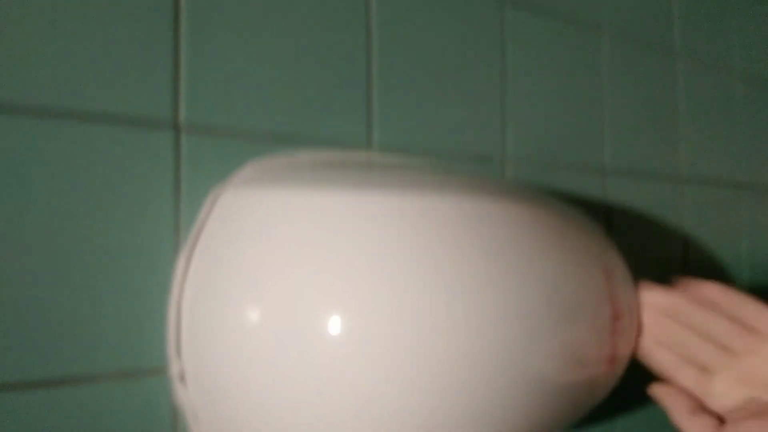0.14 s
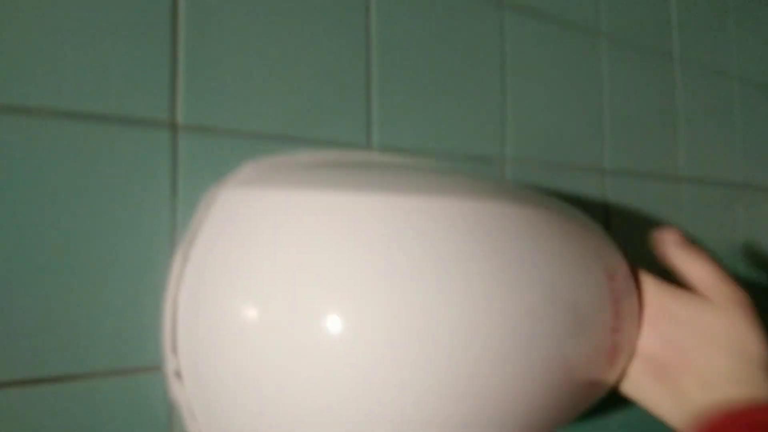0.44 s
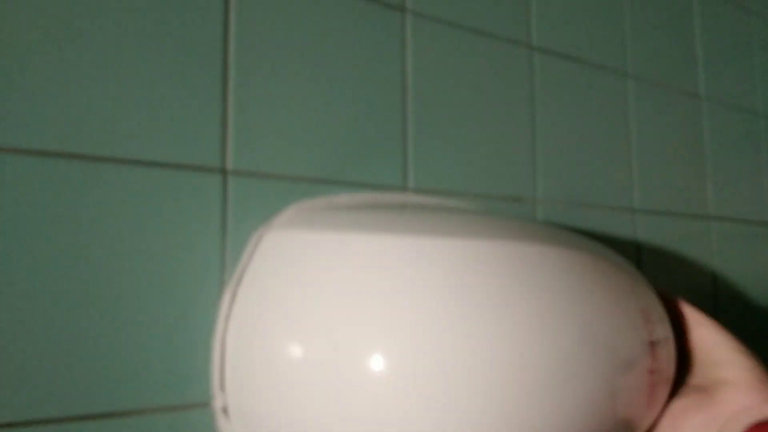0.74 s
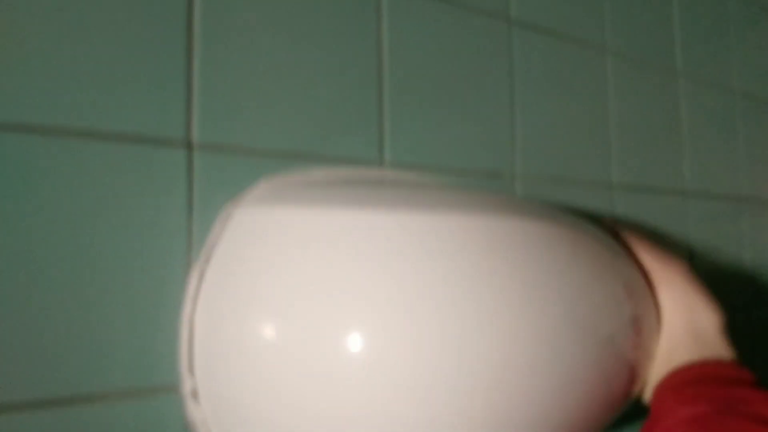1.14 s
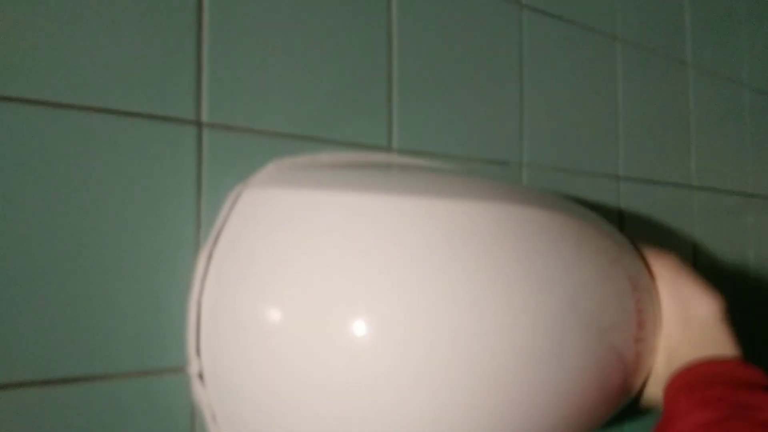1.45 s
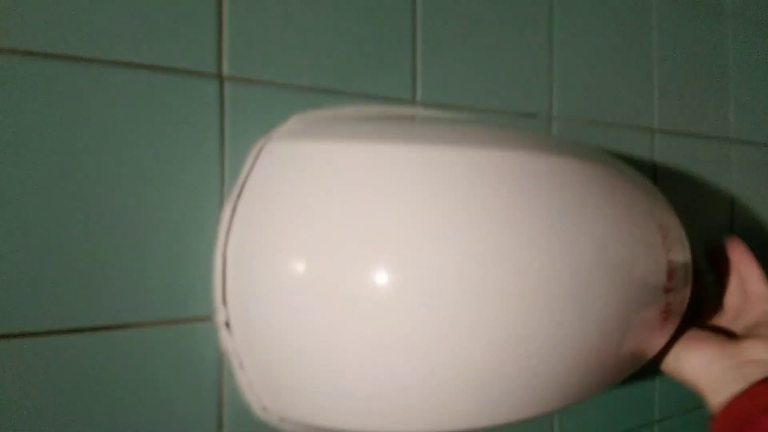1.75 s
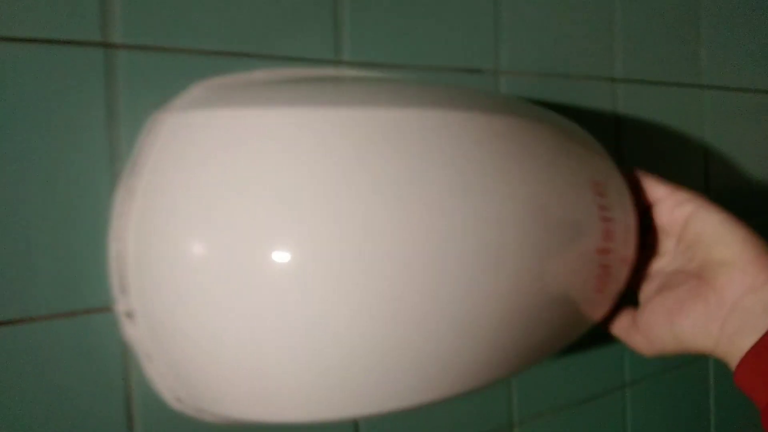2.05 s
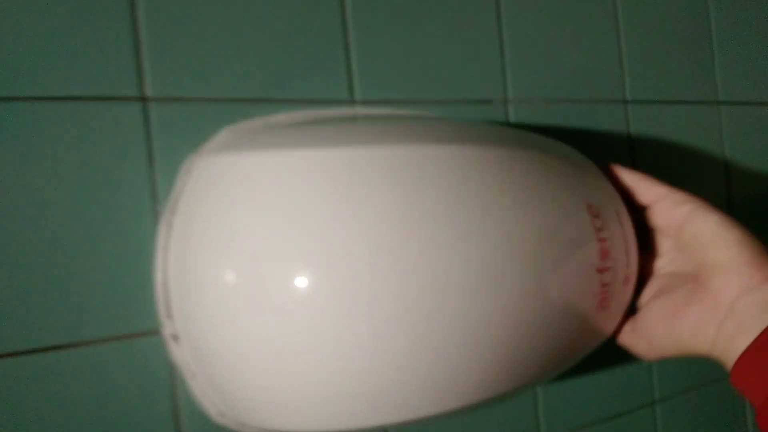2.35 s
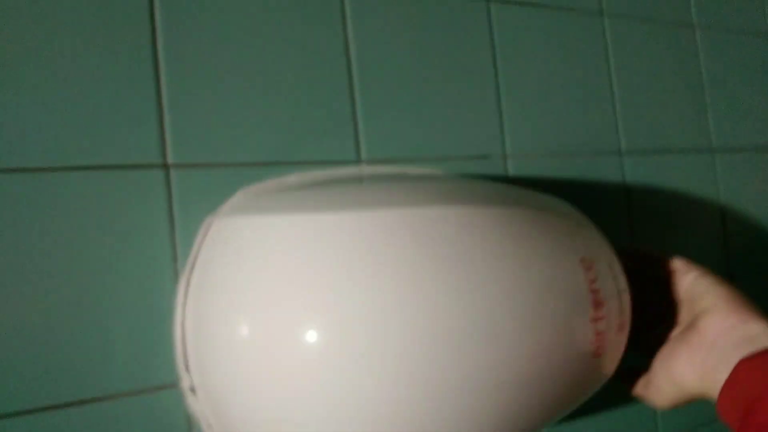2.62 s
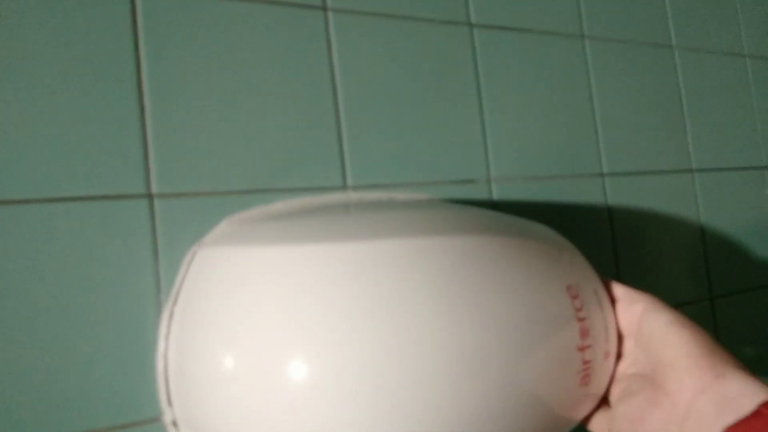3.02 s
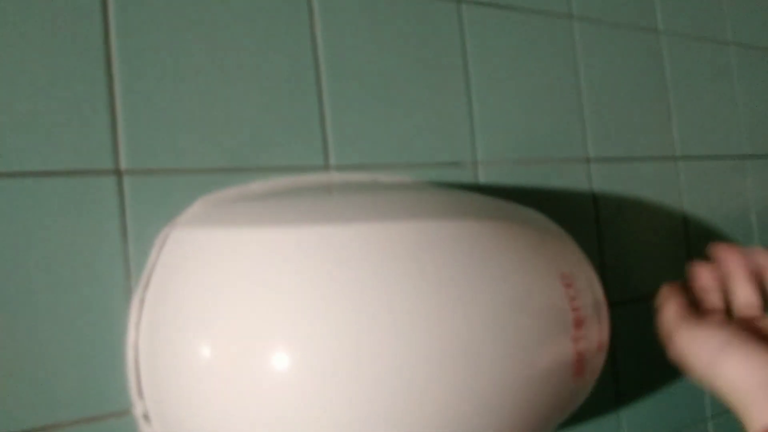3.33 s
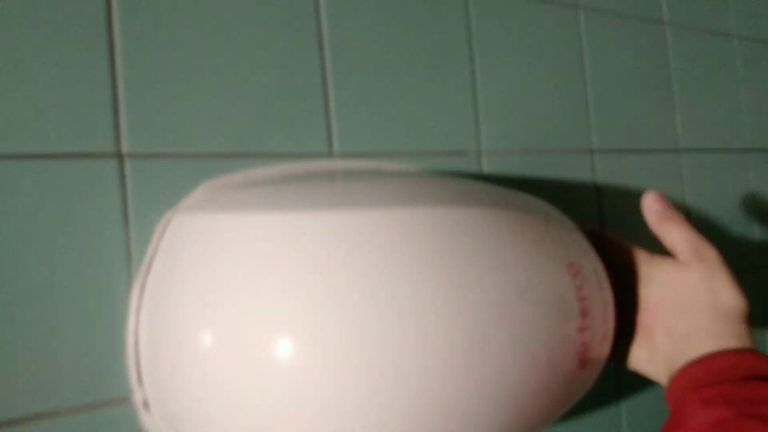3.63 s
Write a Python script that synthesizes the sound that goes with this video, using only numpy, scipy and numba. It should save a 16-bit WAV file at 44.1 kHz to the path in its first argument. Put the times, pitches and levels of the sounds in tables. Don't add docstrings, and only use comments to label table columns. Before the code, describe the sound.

A hand dryer runs throughout in a tiled washroom, close to a single microphone: broad air rush and thin high whine, with bright hissing bursts and lower whistling roars as a hand moves through the jet.

```python
import sys
import numpy as np
from scipy import signal
from scipy.fft import rfft, irfft
from scipy.io import wavfile
from scipy.ndimage import uniform_filter1d
from numba import njit

SR = 44100
rng = np.random.default_rng(int(sys.argv[2]) if len(sys.argv) > 2 else 0)


def int16_out(signal):
    q = np.round(np.clip(np.atleast_2d(signal).T, -1, 1) * 32767)
    wavfile.write(sys.argv[1], SR, q.astype(np.int16))


def volts_from_decibels(level):
    exponent = np.asarray(level, float) / 20
    return 10 ** exponent


N = 166698


def unit(x):
    return x / np.sqrt(np.mean(x ** 2))


def walk(rate_hz):
    hold = int(SR / rate_hz)
    steps = np.repeat(rng.standard_normal(N // hold + 1), hold)
    return 1.3 * uniform_filter1d(uniform_filter1d(steps, hold), hold)[:N]


def bands(colour, walk_db, flicker_db):
    point_hz, point_db = np.array(colour).T
    hz = np.fft.rfftfreq(N, 1 / SR) + 1
    swell = walk(3.22)
    spectrum = rfft(rng.standard_normal(N)) * volts_from_decibels(np.interp(np.log(hz), np.log(point_hz), point_db))
    air = np.zeros(N)
    for k in range(-1, 28):
        thirds_away = np.clip(3 * np.log2(hz / 32) - k, -1, 1)
        band = irfft(spectrum * np.cos(np.pi / 2 * thirds_away) ** 2, N)
        air += band * volts_from_decibels(walk_db * swell + flicker_db * walk(8.94))
    return unit(air)


@njit
def svf(x, hz, k):
    y, band, low = np.empty(len(x)), 0., 0.
    for i in range(len(x)):
        g = np.tan(np.pi * hz[i] / SR)
        v = (band + g * (x[i] - low)) / (1 + g * (g + k))
        band, low, y[i] = 2 * v - band, low + 2 * g * v, k * v
    return y


def motor(t):
    # start_s, blade_pitch_hz, blade_db, shaft_db
    motor_course = [(0, 5031, -26, -36), (.3, 5023, -27, -38), (.55, 5028, -27, -37), (.72, 5020, -36, -39),
                    (.92, 5011, -23, -34), (1.3, 5023, -23, -41), (1.5, 5027, -32, -33),
                    (1.74, 5032, -24, -33), (2.0, 5026, -24, -31), (2.15, 5028, -31, -33),
                    (2.38, 5031, -34, -35), (2.62, 5034, -24, -48), (2.97, 5034, -22, -46),
                    (3.25, 5040, -33, -42), (3.42, 5040, -30, -50), (3.55, 5041, -24, -48),
                    (3.78, 5040, -23, -46)]
    # shaft_multiple, level_db
    whine = [(2, -41), (10, -41), (12, -35), (18, -33.5), (24, -43.5)]
    blades, speed_jitter = 9, .0005
    wander_per_s, wander_db = 40, 2.8
    times, blade_hz, blade_db, shaft_db = np.array(motor_course).T
    shaft_hz = np.interp(t, times, blade_hz) / blades * (1 + speed_jitter * walk(24.9))
    turn = 2 * np.pi * np.cumsum(shaft_hz) / SR
    orders = [(1, np.interp(t, times, shaft_db)), (blades, np.interp(t, times, blade_db))] + list(whine)
    tones = np.zeros(N)
    for k, db in orders:
        tones += np.sqrt(2) * volts_from_decibels(db + wander_db * walk(wander_per_s)) * np.sin(k * turn + k)
    return tones


def casing(t):
    # centre_hz, width_hz, level_db
    resonances = [(125.5, 17, -41), (194.5, 16, -40.5), (299.4, 59, -34.5), (754, 134, -33)]
    bump_db, bump_s = 10.5, 0.071
    hum = np.zeros(N)
    for hz, width_hz, db in resonances:
        ring = unit(svf(rng.standard_normal(N), np.full(N, 1. * hz), width_hz / hz))
        bump = 1 + (hz < 400) * volts_from_decibels(bump_db) * np.exp(-t / bump_s)
        hum += volts_from_decibels(db + 1.44 * walk(4.1)) * ring * bump
    return hum


def free_jet():
    # pitch_hz, level_db per Hz
    jet_colour = [(20, 7), (75, -15), (130, -5), (600, 0.5), (1500, -3.5), (4000, -5), (6800, -0.5),
                  (15800, -19.5)]
    return volts_from_decibels(-20.5) * bands(jet_colour, 0.78, 0.89)


def pass_power(t, start, end, db, rise, fall):
    bend_s = 0.12
    early, late = np.maximum(start - t, 0), np.maximum(t - end, 0)
    drop_db = (rise * early + fall * late) * (1 + (early + late) / bend_s)
    return volts_from_decibels(2 * (db - drop_db))


def splash(t):
    # start_s, end_s, level_db, fade_in_db_per_s, fade_out_db_per_s
    palm_passes = [(0.0, 0.09, -8, 198, 94), (0.411, 0.516, -6.5, 250, 38), (0.818, 0.864, -11, 150, 93),
                   (1.06, 1.096, -10.5, 254, 98), (1.168, 1.29, -7, 124, 29), (1.375, 1.47, -6, 30, 27.5),
                   (1.575, 1.662, -8, 53, 72), (2.032, 2.07, -16, 18, 62), (2.405, 2.486, -9.5, 158, 92),
                   (3.008, 3.167, -9.5, 62, 75), (3.758, 3.8, -16.5, 46, 46)]
    # pitch_hz, level_db per Hz
    hiss_colour = [(500, -15.5), (1500, -18), (3000, -12), (5000, -5.5), (7000, -1.5), (8200, -4.5),
                   (10000, -14.5), (15800, -21)]
    # pitch_hz, level_db per Hz
    sizzle_colour = [(5000, -19), (8500, -11.5), (10000, 0.5), (13000, -7), (15800, -7)]
    sizzle_db, sizzle_steepness = -10, 2.37
    gain = np.sqrt(uniform_filter1d(sum(pass_power(t, *row) for row in palm_passes), 600))
    peak = gain.max()
    hiss = gain * bands(hiss_colour, .5, 0.95)
    sizzle_gain = volts_from_decibels(sizzle_db) * peak * (gain / peak) ** sizzle_steepness
    sizzle = sizzle_gain * bands(sizzle_colour, 0.37, 0.49)
    return (hiss + sizzle) * volts_from_decibels(1.1 * walk(32))


def buffet(t):
    # start_s, level_db, top_hz, length_s
    gusts = [(.004, -10, 169, 0.026), (0.021, -16, 101, 0.099), (0.05, -16.5, 340, 0.087),
             (0.402, -13, 110, .03), (.43, -23, 69.4, 0.03), (0.515, -27, 200, .02), (1.107, -35, 250, .05),
             (1.196, -30, 298, .05), (1.353, -26, 298, 0.064), (1.558, -29, 120, .02),
             (2.218, -20, 250, 0.03), (2.249, -15, 119, 0.019), (2.269, -14.5, 347, .02),
             (2.3, -23, 80, 0.022), (2.359, -18, 60, 0.022), (2.42, -25, 200, 0.032),
             (2.976, -31.5, 80, .05), (3.065, -8.5, 129, 0.03), (3.09, -11.5, 450, 0.024),
             (3.128, -9, 148, 0.03)]
    attack_s = 0.0021
    thuds = np.zeros(N)
    for start, db, top_hz, length in gusts:
        low_band = signal.butter(2, [30, top_hz], "band", fs=SR, output="sos")
        noise = unit(signal.sosfilt(low_band, rng.standard_normal(N)))
        age = np.maximum(t - start, 0)
        thuds += volts_from_decibels(db) * noise * (1 - np.exp(-age / attack_s)) * np.exp(-(age / length) ** 2)
    return thuds


def moving_ring(hz, width):
    return svf(rng.standard_normal(N), hz, width) / np.sqrt(hz)


def roar(t):
    # start_s, level_db, centre_hz, fade_in_db_per_s, fade_out_db_per_s
    finger_passes = [(.03, -18, 2300, 56, 88), (.4, -17, 1530, 152, 41), (.56, -24, 2500, 28, 24),
                     (.72, -21, 1190, 25, 10), (.83, -14.5, 2920, 100, 44), (.91, -18.5, 1900, 36, 120),
                     (1.06, -14.5, 1940, 150, 33), (1.3, -18, 3140, 13, 27), (1.57, -13.5, 2600, 24, 31),
                     (1.74, -28, 1200, 30, 12), (1.94, -17, 1610, 48, 10), (2.03, -16.5, 2130, 58, 30),
                     (2.1, -20.5, 1560, 34, 90), (2.33, -17, 1500, 76, 40), (2.4, -15.5, 3230, 80, 26),
                     (2.531, -14, 2020, 32, 64), (2.9, -16.5, 1470, 47, 42), (2.97, -17, 2370, 71, 4),
                     (3.1, -18.5, 3730, 22, 29), (3.21, -15.5, 2620, 42, 132), (3.28, -23.5, 1000, 37, 85),
                     (3.66, -19, 1310, 57, 3), (3.76, -17, 2180, 60, 10)]
    skirt_db, skirt_ratio = -5.5, 0.43
    edge_db, edge_width = -14.5, 0.093
    powers = [pass_power(t, s, s, db, rise, fall) for s, db, _, rise, fall in finger_passes]
    total = sum(powers) + 1e-12
    centre_hz = sum(p * row[2] for p, row in zip(powers, finger_passes)) / total
    centre_hz = np.clip(uniform_filter1d(centre_hz, 1500), 300, 8000)
    core = unit(svf(moving_ring(centre_hz * (1 + 0.035 * walk(14)), 1), centre_hz, 2.5))
    skirt = volts_from_decibels(skirt_db) * unit(moving_ring(centre_hz * skirt_ratio, 1.43))
    edge = unit(moving_ring(centre_hz * (1 + 0.048 * walk(6)), edge_width))
    body = core + skirt + volts_from_decibels(edge_db + 4.4 * walk(15)) * edge
    return np.sqrt(uniform_filter1d(total, 700)) * body * volts_from_decibels(1.46 * walk(14))


def tiles(air):
    t60_s, level_db = .3, -11
    age = np.arange(SR // 2) / SR
    tail = rng.standard_normal(len(age)) * volts_from_decibels(-60 * age / t60_s) * (age > .004)
    return volts_from_decibels(level_db) * signal.fftconvolve(air, tail / np.sqrt(np.sum(tail ** 2)))[:N]


def scene():
    t = np.arange(N) / SR
    tones = motor(t)
    air = casing(t) + free_jet() + splash(t) + roar(t)
    return np.tile(tones + air + tiles(air) + buffet(t), (2, 1))


def stereo_flecks(mono):
    band_edges = [4200, 5500, 7000, 8600, 10200, 11800, 13400, 14600, 15800]
    frame, offset, flecks = 1024, 96, 27
    side, n = np.zeros(N), np.arange(2 * frame)
    window = signal.windows.kaiser_bessel_derived(2 * frame, 4 * np.pi)
    for when, which in rng.random((flecks, 2)):
        at = offset + frame * int(when * (N // frame - 2))
        k = int(which * (len(band_edges) - 1))
        lines = np.arange(*(np.array(band_edges[k:k + 2]) * 2 * frame // SR))
        basis = window * np.cos(np.pi / frame * np.outer(lines + .5, n + .5 + frame / 2))
        level = np.sqrt(np.mean((basis @ mono[at:at + 2 * frame]) ** 2)) * 2 / frame
        side[at:at + 2 * frame] += level * rng.standard_normal(len(lines)) @ basis
    return volts_from_decibels(-2.5) * side


def top_cut(x):
    return signal.sosfilt(signal.butter(12, 15880, fs=SR, output="sos"), x)


def record(dry):
    ceiling, drive = 0.9, 0.96
    loud = ceiling * np.tanh(drive * dry / ceiling)
    mix = loud + stereo_flecks(loud[0]) * np.array([[1], [-1]])
    return top_cut(mix)


dry = scene()
out = record(dry)
int16_out(out)
```